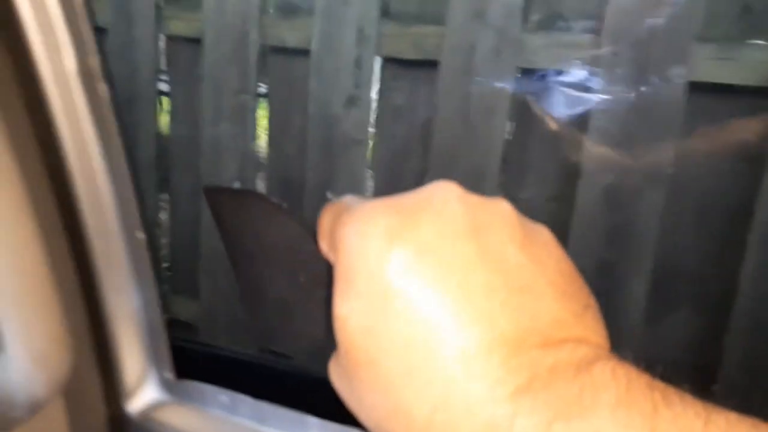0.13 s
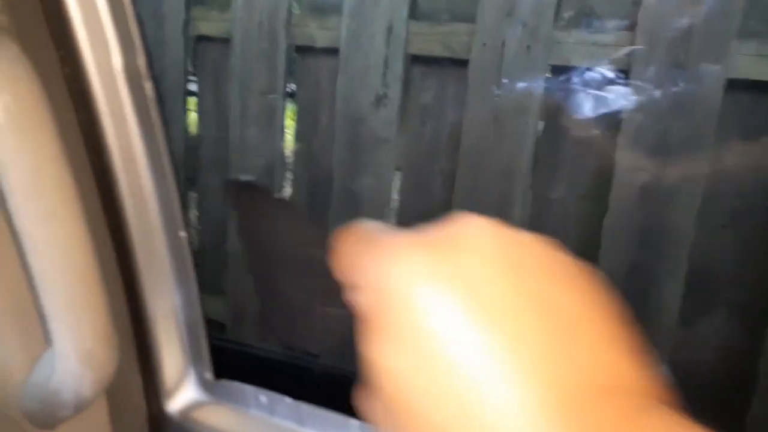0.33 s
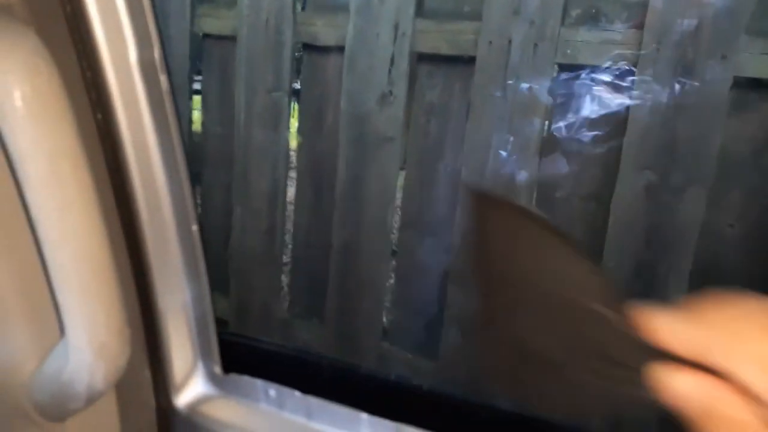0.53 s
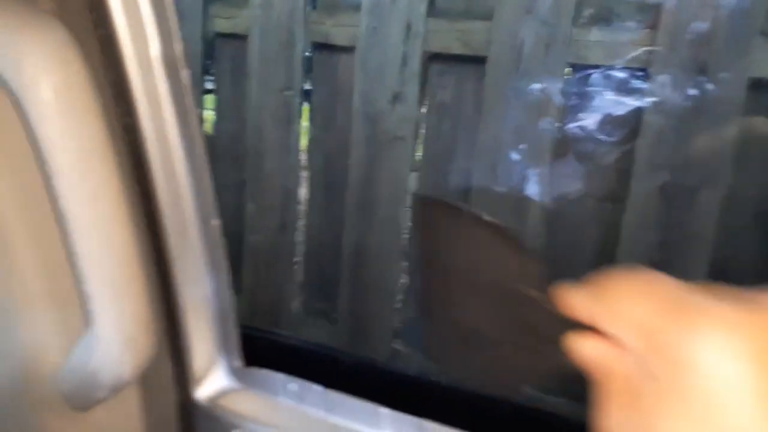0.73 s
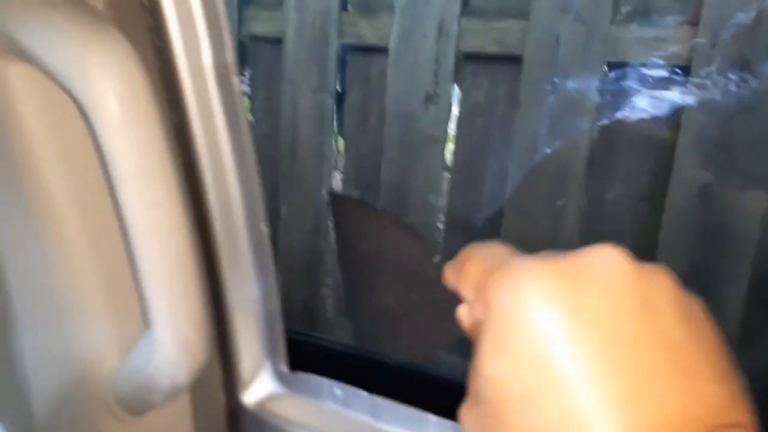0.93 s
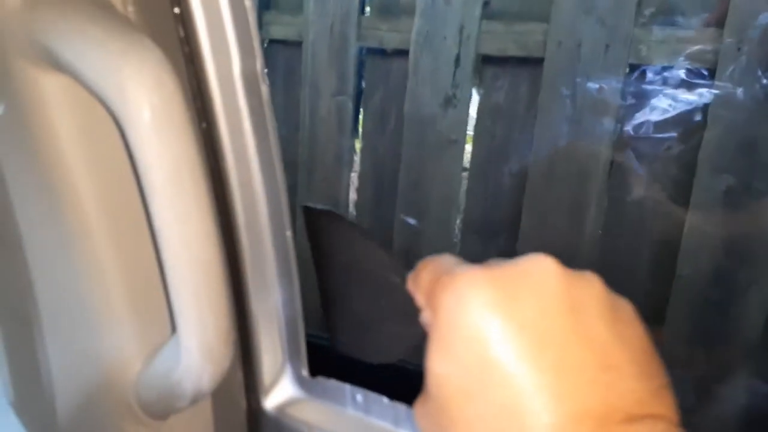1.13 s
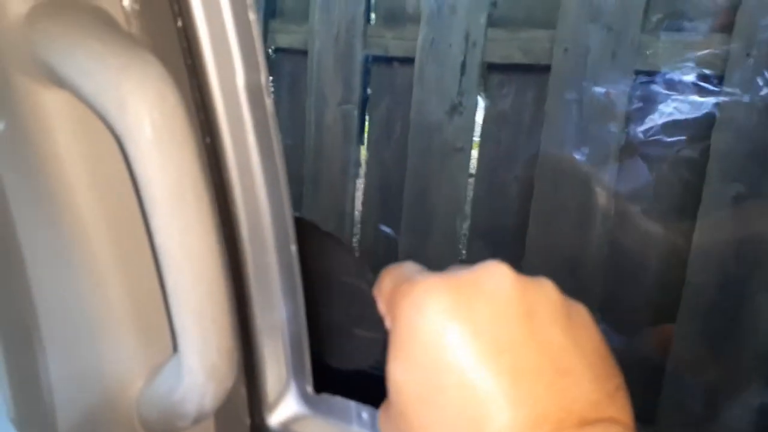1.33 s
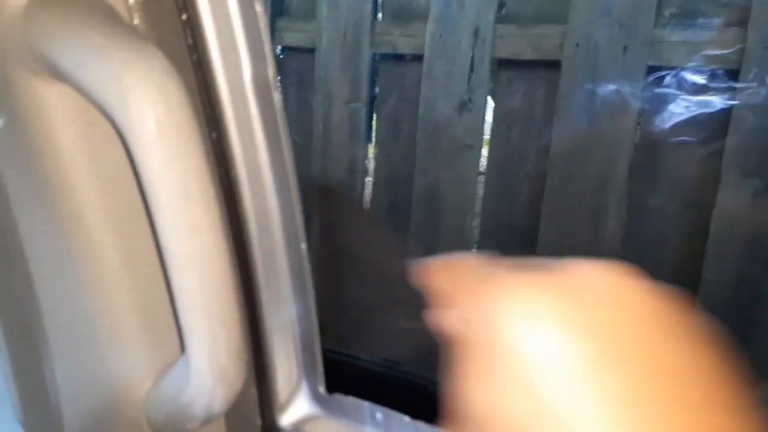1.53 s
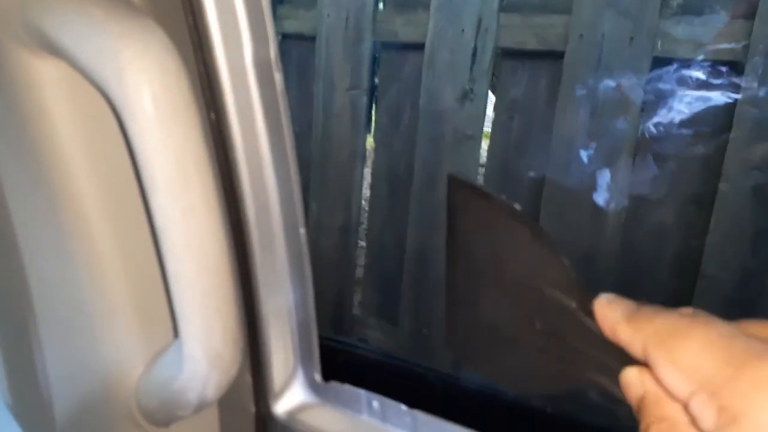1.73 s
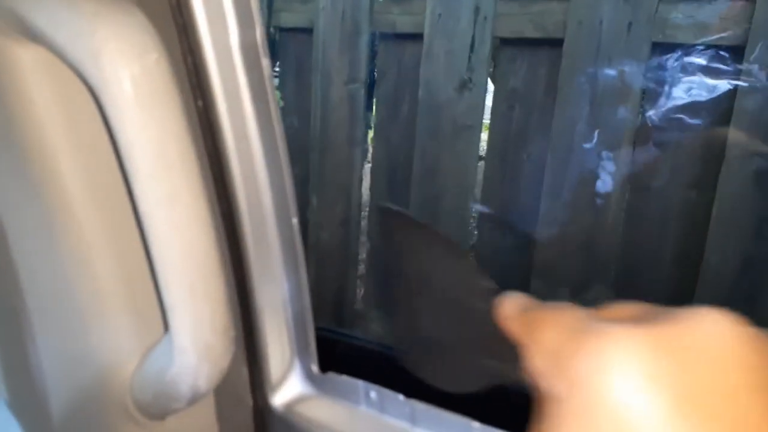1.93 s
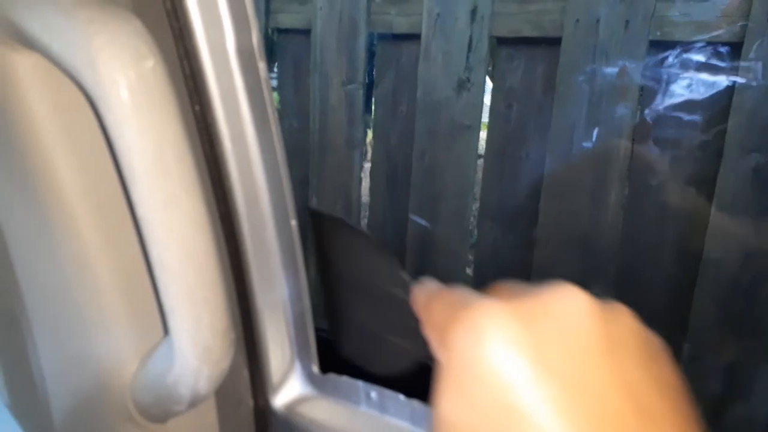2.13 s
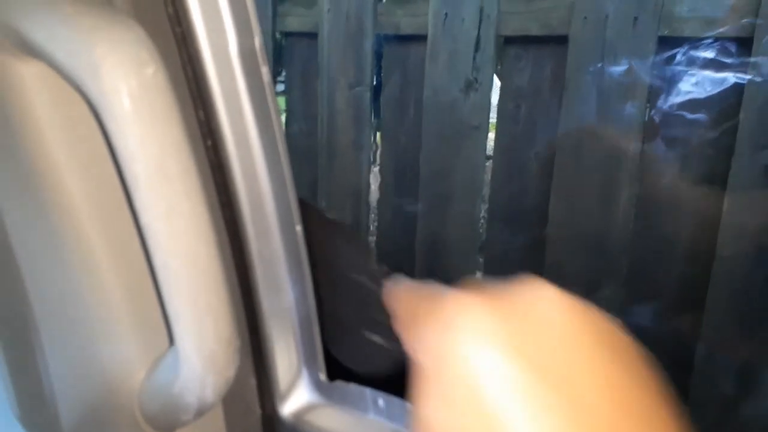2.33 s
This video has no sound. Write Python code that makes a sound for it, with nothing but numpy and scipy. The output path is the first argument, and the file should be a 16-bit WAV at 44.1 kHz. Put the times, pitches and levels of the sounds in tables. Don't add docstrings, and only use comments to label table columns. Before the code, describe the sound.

A hard squeegee blade knocks and scuffs a car window in spaced bursts, ending in a loud rattling cluster; door panel booms, low idle rumble and three faint bird chips, heard close inside a parked car.

```python
import sys
import numpy as np
from scipy import signal
from scipy.io import wavfile
from scipy.ndimage import uniform_filter1d

SR = 44100
rng = np.random.default_rng(int(sys.argv[2]) if len(sys.argv) > 2 else 0)


def output_pcm(signal):
    pcm = np.clip(np.atleast_2d(signal).T, -1, 1) * 32767
    wavfile.write(sys.argv[1], SR, np.round(pcm).astype(np.int16))


def ratio(d):
    e = np.asarray(d, float) / 20
    return 10 ** e


N = 105222
T = np.arange(N) / SR

# time_s, level_db
STREET_OPENNESS = [(0, -13.5), (.25, -6), (.45, -2.5), (1.2, -2.5), (1.6, 3.5), (1.95, 6), (2.38, 4)]
# freq_hz, density_db_per_hz
ROAD_SPECTRUM = [(25, -2), (90, -10), (130, -10.5), (260, -12), (400, -25.5), (1640, -20), (2500, -34.5),
                 (3300, -52.5)]
ROAD_DB, ROAD_FOLLOW_RATIO = -54.5, 0.52
# freq_hz, density_db_per_hz
HISS_SPECTRUM = [(1800, -16), (3000, 2.5), (4900, -1), (7500, -7.5), (8300, 1), (12200, 0), (15600, 4.5),
                 (16200, -41)]
HISS_DB = -80
# freq_hz, correlation
STEREO_LIKENESS = [(60, 0.94), (240, 0.96), (950, 0.047), (3770, 0.024), (15000, 0.02)]
# freq_hz, left_minus_right_db
STEREO_LEAN = [(60, -5), (240, -1), (950, 1.5), (3770, 1), (15000, -2.5)]
# crank_multiple, level_db, drift_db_per_s
ENGINE_ORDERS = [(5, -63, -2), (6, -65, -8), (7, -59.5, -3.5), (8, -62, -6.5), (13, -72.5, -4.5)]
IDLE_HZ, IDLE_SAG_HZ_PER_S, IDLE_BEAT_S, IDLE_WANDER_DB = 13.55, .38, .974, 3.5
# freq_hz, density_db_per_hz
FAN_SPECTRUM = [(130, -21), (168, 11), (210, -32), (520, -47), (660, -2), (880, -8), (1100, -5)]
FAN_DB, FAN_FADE_DB_PER_S = -64, -9

# start_s, level_db
CHIPS = [
    (.515, -50.5),
    (1.183, -51),
    (1.839, -50),
]
# freq_hz, gain_db
CHIP_PATH = [(4000, 14.5), (4900, -6), (6200, -4.5), (7500, -11), (8700, -2), (10000, -13), (11400, 5)]
CHIP_HZ, CHIP_END_HZ, CHIP_WOBBLE_HZ = 11290, 4080, 90
CHIP_HOLD_S, CHIP_FALL_S, CHIP_RISE_S, CHIP_RELEASE_S = 0.018, 0.043, 0.014, 0.0045
YARD_BUILD_S, YARD_T60_S, CHIP_DIRECT_DB, CHIP_PAN_DB = 0.015, 0.3, -18, -2

# start_s, level_db,
# pitch_hz, cycles_to_peak
BLIPS = [(.885, -77, 4800, 8.0), (1.306, -57, 1700, 5.0), (.542, -38, 1530, 1.5),
         (.542, -42, 3750, 3.0), (.5425, -43, 5400, 4.0), (.5752, -40, 1500, 1.2),
         (1.668, -45, 1550, 1.5), (.577, -53, 2600, 12.0), (2.146, -46, 1720, 4.0),
         (2.243, -42, 590, 3.0), (.327, -30, 200, .5), (.575, -46, 680, 8.0), (.273, -36, 4700, 5.0),
         (.272, -38, 80, 1.2), (.275, -38, 285, 4.0), (.34, -42, 280, 6.0), (1.42, -40, 190, 7.0),
         (2.3, -30, 62, 1.5), (1.685, -53, 690, 7.0), (.277, -35, 690, 4.0), (1.38, -40, 700, 4.0),
         (2.303, -25, 720, 5.0)]
# start_s, length_s, level_db
DRAGS = [
    (0.276, .1, -59),
    (0.537, 0.088, -54.5),
    (1.376, 0.14, -52.5),
    (1.667, 0.078, -64.5),
    (2.225, 0.034, -64),
    (2.284, 0.0091, -39),
    (2.292, 0.21, -47.5),
]
# freq_hz, density_db_per_hz
DRAG_SPECTRUM = [(300, -16), (700, 9), (2500, 4), (5000, -11.5), (8000, -10.5), (12000, -8.5), (15500, -12),
                 (16500, -38)]

# start_s, crack_db, knock_re_crack_db, boom_re_crack_db, scrape_length_s
KNOCKS = [(.273, -24, -6.5, -10.5, 0.007), (.332, -47, 0, 2.5, 0.0013), (0.5424, -28, -8.5, -23.5, 0.00055),
          (0.5743, -32, -2.5, -27.5, 0.00068), (1.3779, -28.5, -6, -7, 0.0082),
          (1.4183, -30.5, -4.5, -6, 0.0083), (1.48, -48.5, 2.5, -21, 0.0082),
          (1.493, -38.5, -14, -6.5, 0.0024), (1.671, -40.5, -0.5, -18, 0.00089),
          (1.697, -55.5, 5, -4.5, 0.0019), (1.701, -52, -3.5, -16, 0.0022), (1.727, -55, -9, -12, 0.0017),
          (1.791, -46, -14, -15, 0.00072), (2.234, -57.5, 13, 4, 0.0037), (2.2464, -49, 15.5, -19, 0.00063),
          (2.253, -43, 5.5, -10, 0.0029), (2.2565, -52, 1, -1, .001), (2.2385, -56, 4, -11, 0.0011),
          (2.27, -48, 5, -8, 0.00075), (2.266, -41, -1, 1.5, 0.0012), (2.2859, -37.5, 18, 4, 0.00072),
          (2.293, -37, 5, -18, 0.00084), (2.3085, -17.5, -10, -17.5, 0.0019),
          (2.3536, -22, -7.5, -6.5, 0.0027), (.2865, -39, 4.5, -4, 0.0027), (2.3014, -11, -13, -19, 0.0064),
          (2.335, -30.5, 3, -12, 0.0018), (2.3457, -12.5, -13, -22, 0.005)]
# freq_hz, density_db_per_hz
CRACK_SPECTRUM = [(900, -14), (2000, -5), (3400, -14.5), (4200, 4.5), (5700, -2.5), (7000, -13),
                  (11200, -5.5), (16000, -15.5)]
# freq_hz, density_db_per_hz
TICK_SPECTRUM = [(500, -14), (1500, -9.5), (2300, -23), (3700, 4), (5500, -11), (8000, -7.5), (11200, 0.5),
                 (17000, -9)]
# freq_hz, density_db_per_hz
KNOCK_SPECTRUM = [(200, -18), (400, -12.5), (1040, -16), (1500, -12), (2600, -16.5), (3400, -23),
                  (4500, -26.5), (8000, -71.5)]
# freq_hz, density_db_per_hz
RATTLE_SPECTRUM = [(60, -25), (150, -6), (220, 16), (450, -5.5), (1000, -3), (2500, -114)]
# freq_hz, level_db, t60_s
DOOR_MODES = [(68.4, 1, 0.3), (85.3, -3, 0.27), (125.5, -5.5, 0.41), (151.6, -8.5, 0.64), (173, -3.5, 0.84),
              (197.77, -0.5, 0.96), (244.6, -6.5, 0.49), (272.3, -1.5, 0.76), (283.3, -12, 0.97),
              (324.5, -12.5, 0.41), (394.1, -12, 0.61), (432.5, -22.5, 0.3), (478.4, -26.5, 0.32)]
# freq_hz, level_db, t60_s
TRIM_MODES = [(582, -13.5, 0.3), (613, -15.5, 0.32), (652, -1, 0.36), (679.8, 0, 0.44), (805, -5, 0.23),
              (947, -6, 0.09), (1285, -24, 0.23), (1505, -23, 0.26)]
# freq_hz, t60_s
CABIN_DECAY = [(300, 0.47), (1000, 0.21), (3000, 0.062), (8000, 0.066), (15000, 0.023)]
CRACK_DB, KNOCK_DB, BOOM_DB, TRIM_DB = -8.5, -6, 1, -3
SNAP_S, SCRAPE_EXPONENT, TICK_MAX_S = .0003, 1.8, .0025
KNOCK_EXTRA_S, BOOM_RISE_S = 0.00061, 0.0067
CABIN_DB, KNOCK_CABIN_DB, LATE_DB, LATE_T60_S = -0.5, 2.5, -31, 0.32
RATTLE_DB, RATTLE_T60_S = -12.5, 0.5
BLADE_PAN_DB, DOOR_LEAN_DB, TRIM_LEAN_DB = -1.5, -1.5, 2.0
PORT_LAG_SAMPLES, PORT_DB, PORT_PHASE_RAD = 5.21, 1.8, 0.46
FLUTTER_DB, FLUTTER_HZ = 6, 39

MIC_LOW_HZ, EDGE_HZ, END_FADE_S = 50, 15600, .002
MASK_HZ, MASK_OVER_DB = 11850, 17


def evened(x):
    return x / np.sqrt(np.mean(x ** 2) + 1e-30)


def read(points, hz):
    f, value = np.transpose(points)
    return np.interp(np.log(hz + 1), np.log(f + 1), value)


def add(mix, start_s, sound):
    part = mix[..., round(start_s * SR):][..., :sound.shape[-1]]
    part += sound[..., :part.shape[-1]]


def panned(x, half_lean_db):
    return x * ratio([[half_lean_db], [-half_lean_db]])


def through(x, taps):
    return signal.fftconvolve(np.atleast_2d(x), taps, axes=1)[:, :N]


def colour(x, points):
    hz = abs(np.fft.fftfreq(4096, 1 / SR))
    log_gain = np.log(ratio(read(points, hz)))
    taps = np.fft.ifft(np.exp(log_gain - 1j * signal.hilbert(log_gain).imag)).real[:2048]
    return through(x, taps[None] / np.linalg.norm(taps))


def drift(top_hz):
    rates_hz = np.geomspace(.3, top_hz, 20)
    return evened(sum(np.sin(2 * np.pi * (f * T + rng.random())) / np.sqrt(f) for f in rates_hz))


def wash(points, patchy_db):
    frames, hz = N // 256 + 5, np.fft.rfftfreq(1024, 1 / SR)
    a, b, c, d, patches = rng.standard_normal((frames, 513, 5)).T
    patches = uniform_filter1d(patches, size=10, axis=0)
    patches = evened(uniform_filter1d(patches, size=12, axis=1))
    same = np.clip(read(STEREO_LIKENESS, hz), -1, 1)[:, None]
    lean = ratio(read(STEREO_LEAN, hz) / 2)[:, None]
    left = a + 1j * b
    right = same * left + np.sqrt(1 - same ** 2) * (c + 1j * d)
    z = np.array([left * lean, right / lean])
    below, above = (1, points[0][1] - 20), (points[-1][0] * 1.3, points[-1][1] - 40)
    z *= ratio(read([below] + list(points) + [above], hz)[:, None] + patchy_db * patches)
    return evened(signal.istft(z, nperseg=1024, noverlap=768)[1][:, :N])


def tail(decays, alike):
    a, b = rng.standard_normal((2, SR // 2))
    hz, t, z = signal.stft(np.array([a, b]), SR, nperseg=128)
    same = np.clip(read(alike, hz), -1, 1)[:, None]
    z = np.array([z[0], same * z[0] + np.sqrt(1 - same ** 2) * z[1]])
    out = signal.istft(z * ratio(-60 * t / read(decays, hz)[:, None]), SR, nperseg=128)[1]
    return out / np.linalg.norm(out[0])


def ring(modes, lean_db):
    t, sides = T[:SR], rng.standard_normal((len(modes), 2, 2, 1))
    out = np.zeros((2, SR))
    for (hz, db, t60_s), (port_gain, port_phase) in zip(modes, sides):
        flutter_db = FLUTTER_DB * drift(FLUTTER_HZ)[:SR]
        level = ratio(db - 60 * t / t60_s + PORT_DB * port_gain + flutter_db)
        onset = np.minimum(t * hz, 1)
        out += level * np.sin(2 * np.pi * hz * t + PORT_PHASE_RAD * port_phase) * onset
    return panned(out / np.linalg.norm(out), lean_db)


def street():
    open_db = np.interp(T, *np.transpose(STREET_OPENNESS))
    turns = np.cumsum(IDLE_HZ - IDLE_SAG_HZ_PER_S * T) / SR
    turns = turns - turns[round(IDLE_BEAT_S * SR)]
    idle = np.zeros(N)
    for order, db, slope in ENGINE_ORDERS:
        level_db = db + slope * (T - 1.5) + IDLE_WANDER_DB * drift(top_hz=12.0)
        idle += np.sqrt(2) * ratio(level_db) * np.cos(2 * np.pi * round(order) * turns)
    road_db = ROAD_DB + ROAD_FOLLOW_RATIO * open_db + 0.1 * drift(top_hz=20)
    road = ratio(road_db) * wash(ROAD_SPECTRUM, patchy_db=1.5)
    hiss = ratio(HISS_DB) * wash(HISS_SPECTRUM, patchy_db=0.5)
    return ratio(open_db) * idle + road + hiss


def fan():
    return ratio(FAN_DB + FAN_FADE_DB_PER_S * T) * wash(FAN_SPECTRUM, patchy_db=-2.0)


def bird():
    t, u = np.arange(0, CHIP_HOLD_S + CHIP_FALL_S, 1 / SR), T[:SR // 2]
    hz = CHIP_HZ + (CHIP_END_HZ - CHIP_HZ) * np.clip((t - CHIP_HOLD_S) / CHIP_FALL_S, 0, 1)
    shape = np.minimum(t / CHIP_RISE_S, 1) ** 2 * np.minimum((t[-1] - t) / CHIP_RELEASE_S, 1)
    shape = shape * ratio(read(CHIP_PATH, hz))
    yard_shape = ratio(-60 * u / YARD_T60_S) + 0.62 * ratio(-60 * u / 0.07)
    yard_shape = yard_shape * (1 - np.exp(-u / YARD_BUILD_S))
    direct, scatter = np.zeros(N), np.zeros((2, N))
    for start_s, db in CHIPS:
        wobble = evened(uniform_filter1d(rng.standard_normal(len(t)), size=150))
        phase = 2 * np.pi * np.cumsum(hz + CHIP_WOBBLE_HZ * wobble) / SR
        call = ratio(db) * shape * np.sin(phase)
        yard = rng.standard_normal((2, len(u))) * yard_shape
        add(direct, start_s, ratio(CHIP_DIRECT_DB) * call)
        add(scatter, start_s, through(call, yard / np.linalg.norm(yard[0])))
    return panned(direct + scatter, CHIP_PAN_DB)


def blips():
    out, t = np.zeros(N), T[:6000]
    for start_s, db, hz, cycles in BLIPS:
        u = t * hz / cycles
        add(out, start_s, ratio(db) * u * np.exp(1 - u) * np.sin(2 * np.pi * hz * t))
    return out


def drags():
    out, t = np.zeros((2, N)), T[:14000]
    for start_s, length_s, db in DRAGS:
        a, b, grain = rng.standard_normal((3, len(t)))
        grain = ratio(1.26 * evened(uniform_filter1d(grain, size=120)))
        shape = np.minimum(t / 0.0048, 1) * np.exp(-(t / length_s) ** 2.16)
        add(out, start_s, ratio(db) * np.array([a, .5 * a + 0.91 * b]) * grain * shape)
    return colour(out, DRAG_SPECTRUM)


def squeegee():
    scrape, tick, knock = np.zeros((2, N)), np.zeros((2, N)), np.zeros(N)
    boom = np.zeros((3, N))
    t = T[:4000]
    for start_s, db, knock_db, boom_db, length_s in KNOCKS:
        a, b, c, d, e = rng.standard_normal((5, len(t)))
        shape = np.minimum(t / SNAP_S, 1) * np.exp(-(t / max(length_s, 3e-4)) ** SCRAPE_EXPONENT)
        near = (a * np.exp(0.077 * e) + 3.4 * (t == t[18])) * shape
        far = 0.82 * np.roll(near, round(PORT_LAG_SAMPLES)) + 0.99 * b * shape
        target = tick if length_s < TICK_MAX_S else scrape
        add(target, start_s, ratio(db + CRACK_DB) * np.array([near, far]))
        hit = c * np.exp(-t / (length_s + KNOCK_EXTRA_S))
        add(knock, start_s, ratio(db + knock_db + KNOCK_DB) * hit)
        push = evened(d * t * np.exp(-2 * t / BOOM_RISE_S))
        add(boom[int(start_s)], start_s, ratio(db + boom_db + BOOM_DB) * push)
    crack = panned(colour(scrape, CRACK_SPECTRUM) + colour(tick, TICK_SPECTRUM), BLADE_PAN_DB)
    cabin = ratio(CABIN_DB) * through(crack, tail(CABIN_DECAY, STEREO_LIKENESS))
    late = ratio(LATE_DB) * through(crack, tail([(1, LATE_T60_S)], STEREO_LIKENESS))
    knock = colour(knock, KNOCK_SPECTRUM)
    knock_tail = tail([(300, 0.15), (700, 0.69), (2000, 0.049)], STEREO_LIKENESS)
    knock_cabin = ratio(KNOCK_CABIN_DB) * through(knock, knock_tail)
    lining = colour(boom.sum(0), RATTLE_SPECTRUM)
    rattle = ratio(RATTLE_DB) * through(lining, tail([(1, RATTLE_T60_S)], [(1, 1.0)]))
    trim = ratio(TRIM_DB) * through(knock, ring(TRIM_MODES, TRIM_LEAN_DB))
    door = sum(through(spot, ring(DOOR_MODES, DOOR_LEAN_DB)) for spot in boom)
    return crack + cabin + late + knock + knock_cabin + rattle + trim + door


def scene():
    return street() + fan() + bird() + blips() + drags() + squeegee()


def masked(x):
    hz, _, z = signal.stft(x, SR, nperseg=1024)
    power, top = (abs(z) ** 2).mean(0), hz > MASK_HZ
    whistle = power[(hz > MASK_HZ - 900) & ~top].mean(0)
    treble = power[top & (hz < EDGE_HZ)].mean(0)
    quiet = whistle / (treble + 1e-20) < ratio(2 * MASK_OVER_DB)
    keep = uniform_filter1d(1. * quiet, size=2)
    return signal.istft(z * np.where(top[:, None], keep, 1), SR, nperseg=1024)[1][:, :N]


def band_limit(x):
    return signal.sosfilt(signal.butter(12, 16530, fs=SR, output="sos"), x)


def record(dry):
    low = signal.butter(3, MIC_LOW_HZ, "high", fs=SR, output="sos")
    edge = signal.firwin(255, EDGE_HZ + 200, fs=SR)
    mix = masked(signal.sosfilt(low, dry))
    mix = signal.oaconvolve(mix, edge[None], "same")
    mix = mix * np.minimum(T[::-1] / END_FADE_S, 1)
    return band_limit(mix)


dry = scene()
out = record(dry)
output_pcm(out)
```